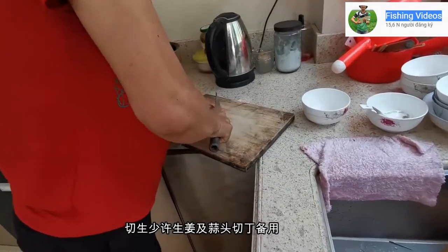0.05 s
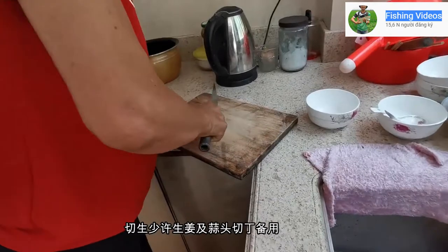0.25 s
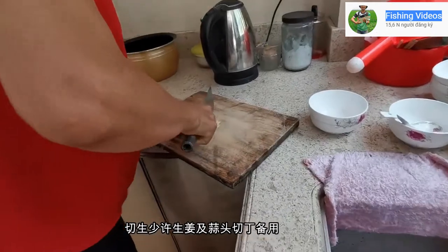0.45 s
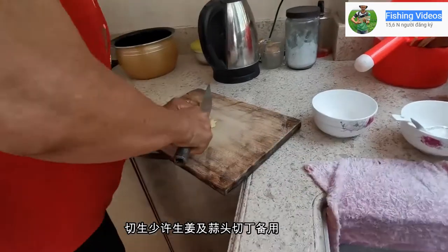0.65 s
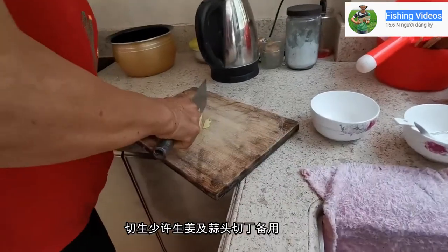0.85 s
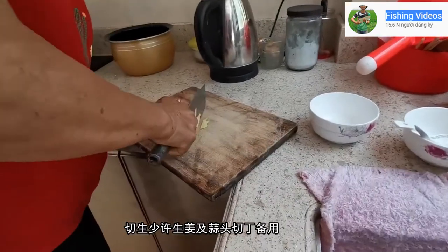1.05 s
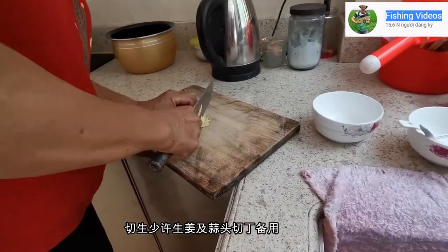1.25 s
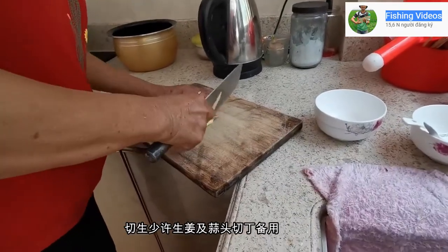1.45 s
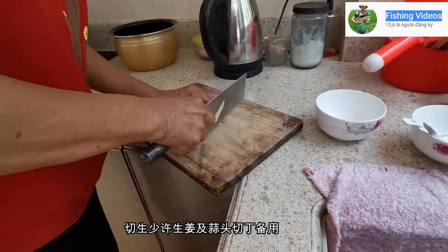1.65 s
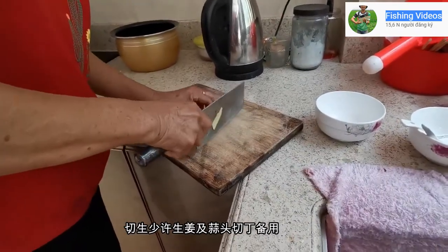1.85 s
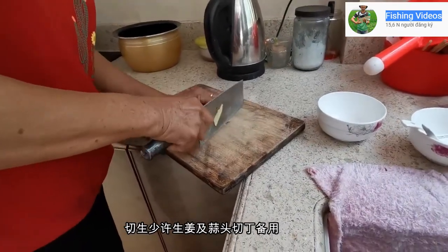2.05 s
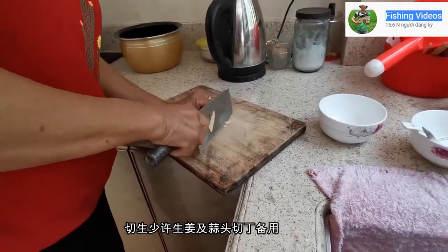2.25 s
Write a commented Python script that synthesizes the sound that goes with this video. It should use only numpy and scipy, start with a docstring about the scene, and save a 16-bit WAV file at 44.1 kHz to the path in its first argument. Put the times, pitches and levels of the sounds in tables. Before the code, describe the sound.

Three crunchy cleaver chops knock on a wooden cutting board in a small kitchen.

```python
"""A quick crunch and a sharp wooden knock: a cleaver slices ginger in a small, hard-walled kitchen.
Three times the fibres snap and the edge hits the board; board, counter and steel ring on,
and counter and walls throw the knock back. Between cuts the blade scrapes lightly,
and after the last it rocks and settles. A faint hum and hiss lie underneath."""
import sys
import numpy as np
from scipy import signal
from scipy.fft import rfft, irfft
from scipy.io import wavfile

SR = 44100
rng = np.random.default_rng(int(sys.argv[2]) if len(sys.argv) > 2 else 0)


def wrap_up_sound(samples):
    """Save the sound to the file named by the first command line argument, as 16-bit audio."""
    columns = np.atleast_2d(samples).T
    # keep every value between -1 and 1, then stretch to whole-number steps
    tamed = np.clip(columns, -1, 1)
    steps = np.round(tamed * 32767).astype(np.int16)
    wavfile.write(sys.argv[1], SR, steps)


N = 101429
T = np.arange(N) / SR
FREQS = np.maximum(np.fft.rfftfreq(2 * N, 1 / SR), 1)

# edge hits board: t/s, knock/dB, contact cut-off/Hz, pitch ratio, crack/dB, thump/dB, ring/dB, steel/dB
CHOPS = [(0.2294, -1, 1500, 1.0, 2.5, 10, -1, -21), (0.7451, -2.5, 1670, 1.008, 2.5, 8, 0.5, -1.5),
         (1.9899, -9.5, 1080, 0.727, -8, 3.5, -8, -19)]
# blade rocks and settles on the board: t/s, knock/dB, tick/dB, rocking/dB
NUDGES = [(1.158, -51, -26, -26.5), (2.006, -16.5, -25, -5), (2.124, -24, -10, -4.5),
          (2.142, -25, -13.5, -2.5), (2.208, -40, -37, -12.5)]
# blade passes through the root: end/s, length/s, peak level/dB, swell up to the peak/dB
CUTS = [(0.225, 0.096, -35, 31), (.746, 0.053, -35.5, 22.5), (1.988, 0.028, -35, 10.5)]
# blade slides on root and board: peak t/s, rise/s, fall/s, level/dB, tilt/(dB per octave)
SCRAPES = [(.13, 0.067, .04, -59, -0.5), (0.554, .012, .02, -52, -2.5), (0.581, .011, 0.034, -42.5, -1),
           (1.159, 0.042, 0.036, -60.5, -0.5), (1.31, 0.11, 0.079, -67, -3.5), (1.681, .028, 0.039, -50, 0),
           (1.73, 0.031, 0.012, -54, -2), (1.92, .007, 0.0078, -58, -3), (2.05, 0.075, 0.02, -51, 2),
           (2.219, 0.097, 0.062, -51, -1.5)]
# steel glides over wet root: peak t/s, half-length/s, centre f/Hz, half-width/octaves, level/dB
GLIDES = [(0.32, 0.044, 12700, 0.13, -60), (1.33, 0.063, 6100, .2, -69.5), (1.487, 0.078, 12200, 0.29, -63),
          (1.914, 0.0064, 10700, 0.061, -56.5)]

# resonances: f/Hz, level/dB, t60/s
KNOCK_MODES = [(544, -26, 0.044), (834, -5.5, 0.0097), (1055.5, -12, .016), (1320, -25, .018)]  # the board's dead knock, at pitch ratio 1
RING_MODES = [(523, -30, .14), (594.3, -25, 0.14), (671, -33, 0.48), (716, -30, .3), (845, -32.5, 0.093),
              (903.5, -31, 0.51), (948, -28.5, 0.12), (954, -35.5, .15), (1145, -21, 0.079),
              (1180, -40.5, .3), (1369, -34.5, 0.5), (1673, -43, 0.15)]  # board and counter ringing on
HOLLOW_MODES = [(730.5, -11.5, 0.25)]  # hollow note building up between counter and walls
COUNTER_MODES = [(87.3, -51.5, 1), (128, -47.5, .22), (145.5, -38, 0.51), (152.5, -43, 0.41),
                 (186.2, -43, 0.5), (233.6, -47, 0.27)]  # counter top and cupboard below
STEEL_MODES = [(2008, -42, .24), (2290, -38.5, 0.19), (2333, -35.5, .36), (2203, -37, 0.29),
               (2440, -41.5, 0.23), (2340, -49, 0.28)]  # the cleaver itself
ROCKING_MODES = [(84.7, -38.5, 0.23), (186, -39.5, 0.17), (233.2, -44, 0.23), (316, -36, 0.11),
                 (394, -35.5, 0.067)]  # board rocking on the counter

# noise colours: f/Hz, relative level/dB
CRACK_SPECTRUM = [(200, -19.5), (600, -3.5), (1250, -8), (1550, 0.5), (2000, 1), (2650, -3), (3400, -12.5),
                  (7000, -12), (8300, -19.5), (11000, -19.5), (15500, -34.5)]  # steel biting wood
CRUNCH_SPECTRUM = [(150, -8.5), (400, -10.5), (900, 1.5), (1600, -4), (2500, -5.5), (3600, -14.5),
                   (7000, -11.5), (8500, -5), (10800, 0.5), (12000, -19.5), (15500, -21.5)]  # snapping fibres
SCRAPE_SPECTRUM = [(200, -23.5), (1100, -14.5), (1500, -8), (2200, -2), (2900, -6), (3500, -7.5),
                   (4600, -4.5), (5300, 0.5), (6000, -5.5), (7000, -1), (8200, -5.5), (10000, -2.5),
                   (13000, -8.5), (15500, -18)]  # sliding blade
AIR_SPECTRUM = [(15, -36.5), (25, -0.5), (59, -7), (133, -13.5), (281, -20), (389, -13), (495, -23.5),
                (582, -17.5), (782, -18), (1620, -27.5), (2700, -21), (3090, -26.5), (4750, -27),
                (6730, -23.5), (7700, -27), (10900, -30.5), (15500, -35.5)]  # room tone

# slap off near surfaces: left delay/s, right delay/s, level/dB
ECHOES = [(.0046, .0030, -5), (.0064, .0061, 3), (.0110, 0.0074, -5.5), (0.0141, 0.0054, -8),
          (.0172, 0.0057, -6.5)]
# kitchen reverb: f/Hz, t60/s, level/dB
ROOM_BANDS = [(40, .6, -22.5), (110, .65, 2.5), (300, 0.59, 5.5), (700, 0.33, 3.5), (1500, 0.6, 2),
              (2530, 0.37, 9), (6000, 0.68, 3.5), (14000, 0.29, 3.5)]
# appliance hum: f/Hz, rms level/dB
HUM_PARTIALS = [(49.3, -63.5), (98, -78), (147, -76), (596, -79)]
# stereo balance: f/Hz, right minus left/dB
RIGHT_LEAN = [(50, -4.5), (130, 1), (400, 1), (700, 4.5), (1200, 2.5), (2400, 10.5), (4400, 3.5),
              (7000, 13), (9000, -0.5), (11000, 8.5), (15000, 14)]


def amp(db):
    """Decibels to gain."""
    return 10 ** (np.asarray(db) / 20)


def curve(points, hz=FREQS, column=1):
    """Read a table on a log-frequency axis."""
    table = np.array(points, float)
    return np.interp(np.log(hz), np.log(table[:, 0]), table[:, column])


def shape(x, response):
    """Filter by a frequency response."""
    return irfft(rfft(x, 2 * N) * response)[..., :N]


def causal(db):
    """Minimum-phase response with the given gain: nothing rings ahead of the attack."""
    cepstrum = irfft(np.log(amp(db)))
    cepstrum[1:N] *= 2
    cepstrum[N + 1:] = 0
    return np.exp(rfft(cepstrum))


def coloured(noise, db):
    """Give a noise a spectrum, at rms 1."""
    filtered = shape(noise, amp(db))
    return filtered / filtered.std()


def delay(x, seconds):
    """Start a sound later."""
    return np.interp(T - seconds, T, x, left=0)


def attack(rise_s):
    """Exponential rise towards 1."""
    return 1 - np.exp(-T / rise_s)


def fade(t60):
    """Decay by 60 dB in t60 seconds."""
    return np.exp(-np.log(1000) * T / t60)


def modes(table, pitch=1):
    """Struck resonances: a sum of dying sines."""
    return sum(amp(db) * fade(t60) * np.sin(2 * np.pi * hz * pitch * T) for hz, db, t60 in table)


def stereo_noise(crossover_hz=1100):
    """Noise centred in the bass, wide in the treble."""
    mid, side = rng.standard_normal((2, N))
    alike = 1 / (1 + (FREQS / crossover_hz) ** 2)
    mid = shape(mid, np.sqrt((1 + alike) / 2))
    side = shape(side, np.sqrt((1 - alike) / 2))
    return np.array([mid + side, mid - side])


def grains(per_s=4500, spread_db=3.5):
    """Dense tiny fractures of uneven size."""
    clicks = (rng.random(N) < per_s / SR) * rng.standard_normal(N)
    return clicks * amp(spread_db * np.minimum(rng.exponential(size=N), 4))


def chops(hollow_rise_s=0.058):
    """The edge hits the board, duller for a softer contact: returns the knocks and their ring-out."""
    knocks, rings = np.zeros((2, N))
    hollow = modes(HOLLOW_MODES) * (1 - np.exp(-(T / hollow_rise_s) ** 2))
    ring = board_radiation(modes(RING_MODES) + hollow)
    for start, cutoff_hz, knock_db, pitch, crack_db, thump_db, ring_db, steel_db in (
            (row[0], row[2], row[1], *row[3:]) for row in ()):
        pass
    for start, knock_db, cutoff_hz, pitch, crack_db, thump_db, ring_db, steel_db in CHOPS:
        contact = causal(-10 * np.log10(1 + (FREQS / cutoff_hz) ** 4))
        wood = -amp(knock_db) * shape(modes(KNOCK_MODES, pitch), contact)
        bite = amp(crack_db) * edge_crack(t60=0.025)
        knocks += delay(board_radiation(wood + bite), start)
        ring_out = -amp(ring_db) * shape(ring, contact)
        thump = amp(thump_db) * modes(COUNTER_MODES)
        steel = amp(steel_db) * modes(STEEL_MODES)
        rings += delay(ring_out + attack(0.0035) * (thump + steel), start)
    return knocks, rings


def edge_crack(t60, level_db=-10):
    """The short, toneless burst of steel biting wood."""
    burst = rfft(rng.standard_normal(N) * fade(t60) * attack(0.0022), 2 * N)
    flattened = burst / (abs(burst) + 1e-9) * np.sqrt(np.mean(abs(burst) ** 2))
    return amp(level_db) * irfft(flattened * causal(curve(CRACK_SPECTRUM)))[:N]


def board_radiation(x, low_cut_hz=510, leak_db=-15):
    """Deep vibration mostly cancels around the board's edges; a little leaks out."""
    body = signal.sosfilt(signal.butter(5, low_cut_hz, "high", fs=SR, output="sos"), x)
    leak = signal.sosfilt(signal.butter(2, 110, "high", fs=SR, output="sos"), x)
    return body + amp(leak_db) * leak


def nudges():
    """The settling blade gives low knocks and ticks, and the board rocks on the counter."""
    out = np.zeros(N)
    for start, knock_db, tick_db, rock_db in NUDGES:
        wood = amp(knock_db) * modes(KNOCK_MODES, pitch=0.79)
        tick = amp(tick_db) * edge_crack(t60=0.014)
        rocking = amp(rock_db) * attack(0.0087) * modes(ROCKING_MODES)
        out += delay(board_radiation(wood + tick) + rocking, start)
    return out


def slicing(release_s=0.0055):
    """Fibres snap ever harder until the edge is through."""
    force = 0
    for end, length, db, swell_db in CUTS:
        travel = np.minimum((T - end) / length, 0)  # -1 going in, 0 once through
        release = np.exp(-np.maximum(T - end, 0) / release_s)
        force += amp(db + swell_db * travel) * (travel > -1) * release
    return force * coloured(grains(), curve(CRUNCH_SPECTRUM))


def scraping():
    """The blade drags over root and board in gritty strokes that swell and die away."""
    out = 0
    for peak, rise, fall, db, tilt_db in SCRAPES:
        stroke = np.exp(-(np.minimum(T - peak, 0) / rise) ** 2 - np.maximum(T - peak, 0) / fall)
        grit = coloured(grains(), curve(SCRAPE_SPECTRUM) + tilt_db * np.log2(FREQS / 1000))
        out += amp(db) * stroke * grit
    return out


def gliding():
    """Narrow, airy hiss as the flat of the blade slides over the wet root."""
    out = 0
    for peak, half_length, hz, octaves, db in GLIDES:
        swell = np.exp(-((T - peak) / half_length) ** 2)
        band_db = -10 * np.log10(1 + (np.log2(FREQS / hz) / octaves) ** 4)
        out += amp(db) * swell * coloured(grains(), band_db)
    return out


def worktop_response(echo_top_hz=2600, scatter_db=3):
    """The direct sound, a few dull echoes and scatter from pots, bowls and tiles."""
    echoes = sum(amp(db) * np.exp(-2j * np.pi * FREQS * np.array([[left], [right]]))
                 for left, right, db in ECHOES)
    scatter = stereo_noise() * fade(0.075) * attack(0.0029) ** 2
    scatter /= np.sqrt(np.sum(scatter ** 2, axis=1, keepdims=True))
    return 1 + echoes / (1 + 1j * FREQS / echo_top_hz) + amp(scatter_db) * rfft(scatter, 2 * N)


def kitchen_reverb(send):
    """Hard walls return a diffuse tail that dies away octave by octave."""
    noise = rfft(stereo_noise(), 2 * N) * amp(curve(ROOM_BANDS, column=2))
    centres = 62.5 * 2 ** np.arange(9)
    tail = 0
    for hz, solo in zip(centres, np.eye(len(centres))):
        band = irfft(noise * np.interp(np.log(FREQS), np.log(centres), solo))[:, :N]
        t60 = curve(ROOM_BANDS, hz, column=1)
        unit_energy = np.sqrt(2 * np.log(1000) / (t60 * SR))
        tail += band * fade(t60) * unit_energy
    return shape(send, rfft(tail * attack(0.012), 2 * N))


def room_tone(air_db=-61):
    """Room air and the hum of an appliance."""
    hum = sum(amp(db) * np.sqrt(2) * np.sin(2 * np.pi * (hz * T + rng.random()))
              for hz, db in HUM_PARTIALS)
    return amp(air_db) * coloured(stereo_noise(), curve(AIR_SPECTRUM)) + hum


def scene(blade_db=-4, ring_send_db=-15, blade_send_db=-2):
    """Board and blade heard directly, off the near surfaces and through the room."""
    knocks, rings = chops()
    knocks += nudges()
    blade = amp(blade_db) * (slicing() + scraping() + gliding())
    far = kitchen_reverb(knocks + amp(ring_send_db) * rings + amp(blade_send_db) * blade)
    near = shape(knocks, worktop_response()) + shape(blade, worktop_response())
    return near + rings + far + room_tone()


def record(dry, right_lag_s=0.00006, ceiling=0.8, top_hz=15700):
    """Two unequal microphone ports, the right brighter and a little late; soft clip, then a high cut."""
    lean_db = curve(RIGHT_LEAN) / 2
    left = shape(dry[0], amp(-lean_db))
    right = shape(dry[1], amp(lean_db) * np.exp(-2j * np.pi * FREQS * right_lag_s))
    rounded = ceiling * np.tanh(np.array([left, right]) / ceiling)
    return signal.sosfiltfilt(signal.ellip(12, .05, 70, top_hz, fs=SR, output="sos"), rounded)


dry = scene()
out = record(dry)
wrap_up_sound(out)
```